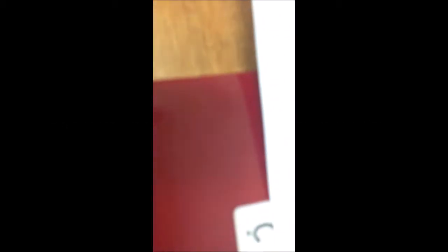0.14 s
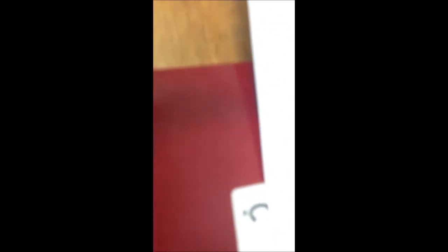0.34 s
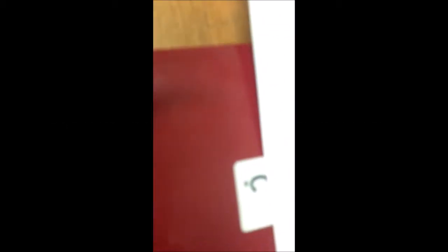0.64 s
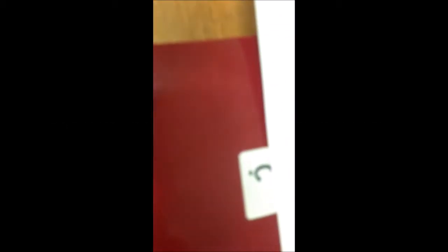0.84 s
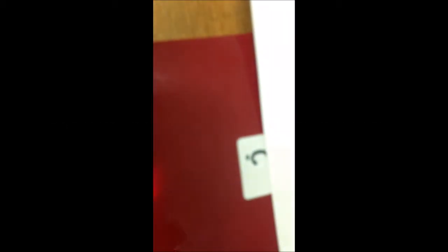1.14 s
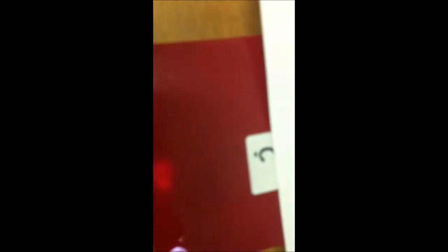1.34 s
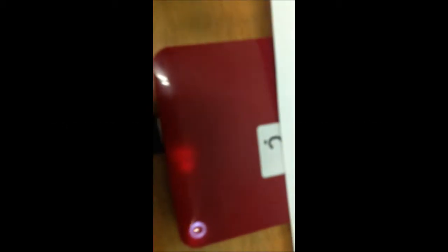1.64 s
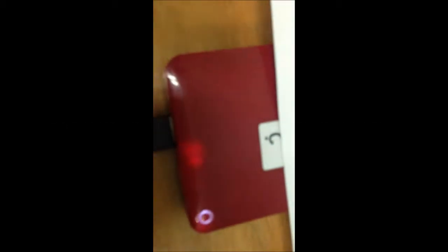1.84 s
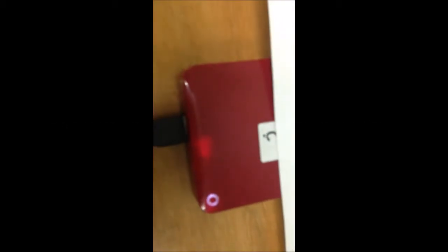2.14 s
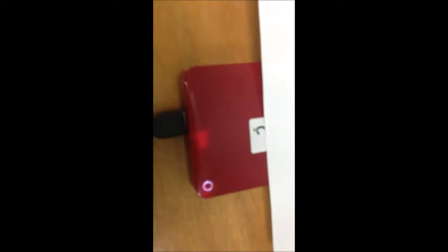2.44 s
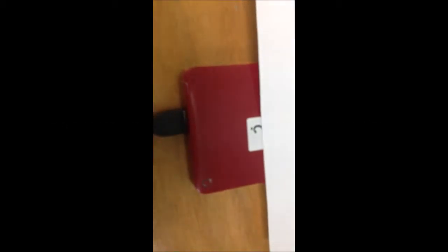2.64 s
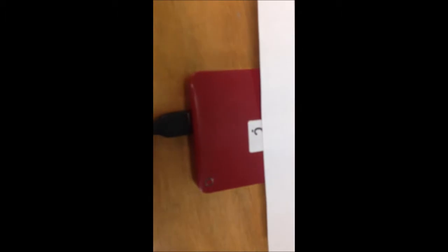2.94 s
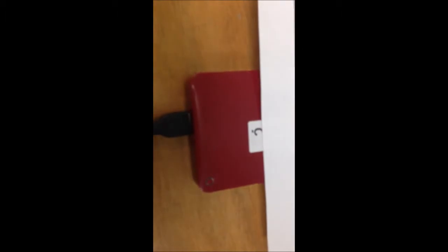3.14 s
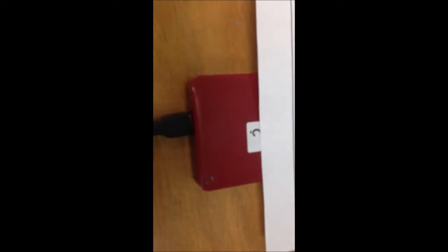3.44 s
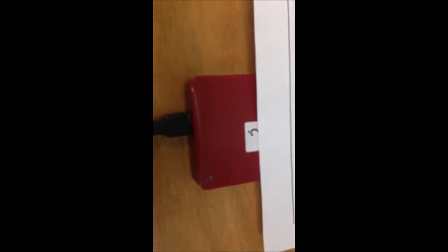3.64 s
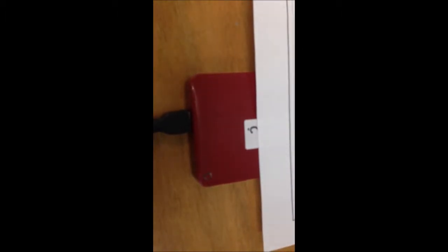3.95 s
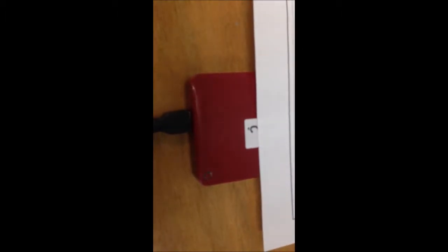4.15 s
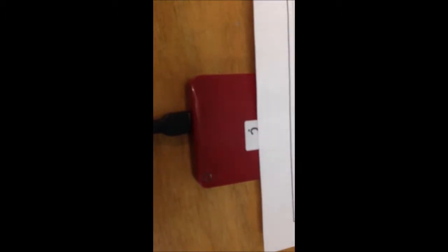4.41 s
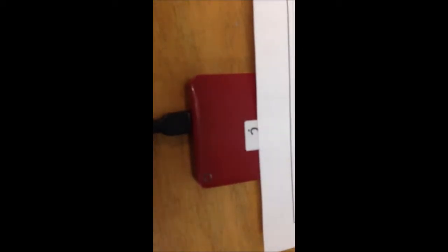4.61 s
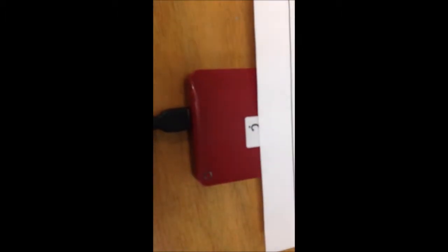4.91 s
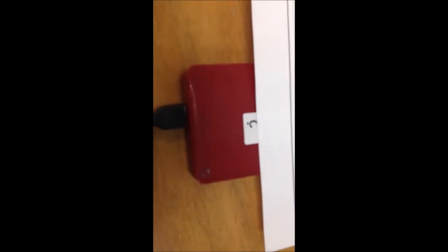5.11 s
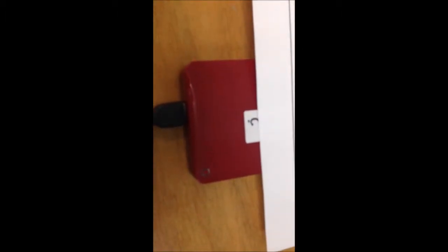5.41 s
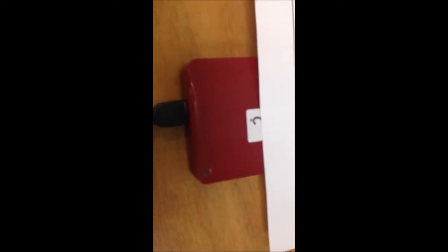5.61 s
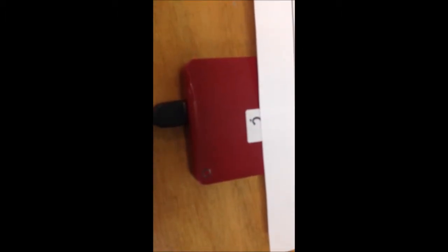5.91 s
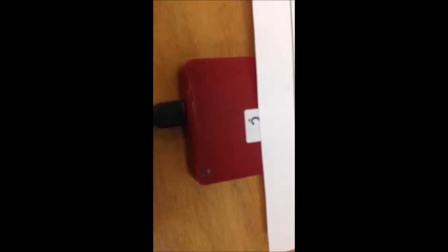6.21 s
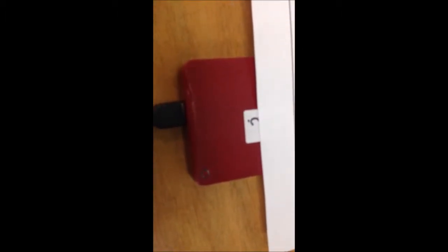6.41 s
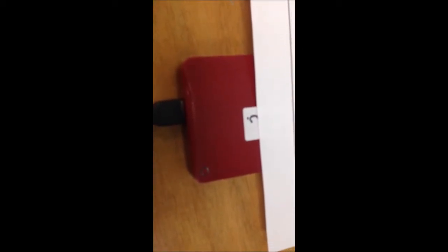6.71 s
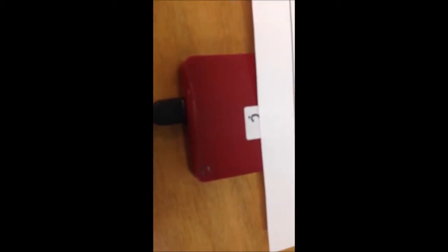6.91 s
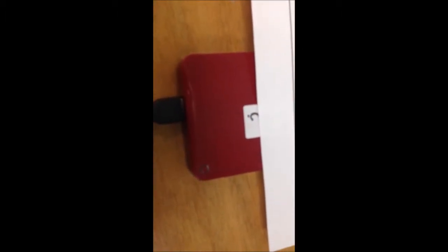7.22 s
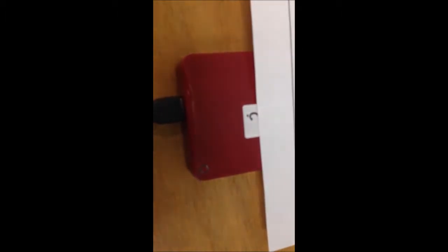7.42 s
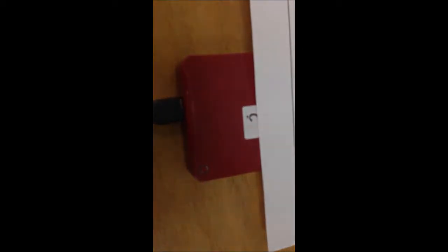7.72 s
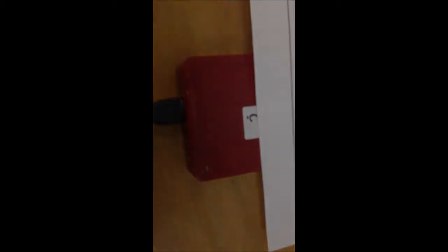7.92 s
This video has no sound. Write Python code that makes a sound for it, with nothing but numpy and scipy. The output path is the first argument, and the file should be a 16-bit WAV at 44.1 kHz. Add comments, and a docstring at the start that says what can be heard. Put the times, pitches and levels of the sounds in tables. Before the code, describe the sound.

A small external hard drive on a wooden desk clicks right from the start, heard close up in a room with little echo. The click repeats evenly every 0.8 seconds, ten times in all, the last at about 7.3 seconds. Each one is sharp and bright, with a tiny rebound and a brief metallic ring, and is followed by a very faint whisper as the drive's arm seeks. The first three clicks are the strongest; from about 2.4 seconds they are slightly softer, and they grow a little duller toward the end. Faint dry scrapes of handling come at around 0.2 to 0.4 seconds and again at 2.1 seconds. Two soft bumps of a hand on the microphone fall at about 0.7 and 1.6 seconds. A quiet, low room hum continues steadily underneath throughout.

```python
"""Sharp, ringing clicks, one every 0.8 s, come from a small external hard drive on a wooden desk.
Each time the head arm buzzes, slams into its stop and rebounds twice; the impacts excite the damped
modes of the case. Then the arm seeks faintly. The clicks weaken after the third, as a hand-held camera
backs away. Behind them are a low room hum, two soft bumps of the hand and some faint scrapes."""
import sys
import numpy as np
from scipy import signal
from scipy.fft import rfft, irfft
from scipy.io import wavfile

SR = 44100
rng = np.random.default_rng(int(sys.argv[2]) if len(sys.argv) > 2 else 0)


def dump_mix(stems):
    """Bounce the given channels to the path in sys.argv[1] as a 16-bit WAV at rate SR."""
    frames = np.atleast_2d(stems).T  # one column per channel
    limited = np.clip(frames, -1, 1)  # hard clip at full scale
    pcm = np.round(limited * 32767).astype(np.int16)
    wavfile.write(sys.argv[1], SR, pcm)


N = 355401

# steady room noise: (frequency [Hz], relative density [dB])
ROOM_SPECTRUM = [(20, -23), (50, -8.5), (75, -12), (125, 1), (185, 6.5), (260, 3.5), (310, -0.5), (500, -4),
                 (750, -6), (900, -12.5), (1600, -15), (2800, -19.5), (7000, -23.5), (15000, -24.5)]
# resonances of the hum: (frequency [Hz], half width [Hz], rms level [dB])
HUM_BANDS = [(57.4, 2.1, -76), (88.2, 3.6, -71.5), (146.8, 6.2, -63.5), (203.2, 12, -60), (221.6, 9, -53.5),
             (249, 8.6, -68.5), (339.2, 8.7, -68.5), (467, 18, -71.5), (506.4, 3.5, -75), (604.4, 5.9, -73)]
# reverberation of desk and room: (frequency [Hz], t60 [s])
ROOM_T60 = [(200, .2), (1400, .09), (3200, .095), (6000, .09), (14000, .07)]
# bumps of the hand: (time [s], gain [dB])
BUMP_EVENTS = [(.746, -47), (1.586, -47.5)]
# modes that a bump excites: (frequency [Hz], relative level [dB], t60 [s])
THUD_MODES = [(154, -7, 0.4), (261, 3, 0.14), (334.5, 3, 0.18), (447, 2, 0.055), (727, 1.5, 0.051)]
# tick of a bump: (frequency [Hz], relative density [dB])
TICK_SPECTRUM = [(100, -13), (500, 2), (1000, -21), (2200, -5), (4000, -16), (6500, -10), (15000, -25)]
# dry scrapes: (time [s], duration [s], level [dB])
SCRAPE_EVENTS = [(0.243, 0.056, -52), (0.347, 0.032, -54), (0.36, 0.07, -50.5), (2.11, .12, -59)]
# friction noise: (frequency [Hz], relative density [dB])
SCRAPE_SPECTRUM = [(500, 5.5), (1300, -10), (2100, -1.5), (3200, -4), (4500, -11), (6500, -17), (9000, -18),
                   (15000, -24)]
# sweeps of the arm: (delay after the click [s], duration [s], level relative to the click's gain [dB])
ARM_SWEEPS = [(0.213, 0.084, -71.5), (0.334, 0.083, -75.5), (.19, 0.29, -79)]
# whisper of seeking: (frequency [Hz], relative density [dB])
SEEK_SPECTRUM = [(1000, -13), (2700, -10), (3200, 3), (4000, -2), (4700, -6.5), (5500, -3.5), (7000, -13),
                 (15000, -31)]
# tones of the arm's coil: (frequency [Hz], relative level [dB])
COIL_TONES = [(1720, -52.5), (3050, -51), (3400, -47), (3960, -31.5), (4460, -45)]
# rasp of the coil: (frequency [Hz], relative density [dB])
RASP_SPECTRUM = [(600, -20), (1500, 5), (2500, -20), (4000, -3), (5000, 1), (5700, -1), (6500, -1),
                 (7500, -28), (15000, -15)]
# modes of the case: (frequency [Hz], relative level [dB], t60 [s])
CASE_MODES = [(753, -46, 0.067), (955, -49.5, 0.069), (1302, -38.5, 0.056), (1416, -34, 0.017),
              (1523, -35.5, 0.03), (2107, -36, 0.03), (2890, -47, 0.025), (3058, -22.5, 0.029),
              (3277, -25.5, 0.031), (3406, -25, 0.03), (3824, -36.5, 0.05), (3990, -29.5, 0.02),
              (4115, -34.5, 0.033), (4440, -38, 0.023), (5375, -27, 0.014), (8390, -49, 0.022)]
# contacts within one blow: (delay [ms], relative level [dB])
CHATTER_CONTACTS = [(.6, 0.5), (1.9, -3.5), (3.4, -3.5)]
# broad resonances of the metal parts: (frequency [Hz], half width [Hz], relative level [dB])
METAL_BANDS = [(1440, 730, -16.5), (3360, 360, -4), (4560, 420, -7), (5330, 110, -11.5), (6420, 740, -9),
               (8405, 120, -11), (9360, 190, -17), (10070, 280, -16.5), (12060, 450, -20.5),
               (13400, 250, -17.5), (14600, 450, -22)]
# the crack weakens, so the clicks grow duller: (time [s], relative level [dB])
CRACK_TREND = [(0, 5.5), (4, 4.5), (7.3, 1.5)]
# blows of the arm on its stop: (time [s], gain [dB], delay of the first rebound [ms])
CLICK_EVENTS = [(.0031, 2.5, 10.4), (0.8092, 2, 10.5), (1.6171, 0.9, 11.5), (2.4151, -1.6, 12.5),
                (3.2165, -2, 11.2), (4.022, -2, 10.7), (4.83, -2.2, 10.6), (5.6378, -2, 11.3),
                (6.4514, -0.9, 9.9), (7.261, -1.1, 10.5)]

BUZZ_DB = -3.3  # added to the click's gain
REBOUND_GAINS_DB, REBOUND_SPREAD_DB = (-2.5, -16), 1.46
REBOUND_DELAY_RATIO = 2.3  # second rebound to first
RING_TILT_DB_PER_OCTAVE, MODE_SPREAD_DB = 0.4, 1.17
CUTOFF_HZ = 15330


def amp(db):
    return 10 ** (np.asarray(db) / 20)


def unit(x):
    return x / np.sqrt(np.mean(x ** 2) + 1e-20)


def log_interp(points, hz):
    """Linear interpolation of (frequency, value) points on a log-frequency axis."""
    f, value = np.transpose(points)
    return np.interp(np.log(hz + 1), np.log(f + 1), value)


def add(mix, s, sound):
    """Superposition: a sound joins the mix at time s."""
    at = int(round(s * SR))
    sound = sound[max(-at, 0):]
    part = mix[max(at, 0):][:len(sound)]
    part += sound[:len(part)]


def noise(spectrum, size):
    """Spectral shaping of white noise, scaled to rms 1."""
    hz = np.fft.rfftfreq(size, 1 / SR)
    return unit(irfft(rfft(rng.standard_normal(size)) * amp(log_interp(spectrum, hz)), size))


def wander(rate_hz):
    """Low-pass filtering of noise gives a random curve of rms 1."""
    hz = np.fft.rfftfreq(N, 1 / SR)
    return unit(irfft(rfft(rng.standard_normal(N)) * np.exp(-(hz / rate_hz) ** 2), N))


def resonant_noise(bands, size):
    """Resonance gathers random excitation into bands."""
    hz, out = np.fft.rfftfreq(size, 1 / SR), np.zeros(size)
    for centre, width, db in bands:
        band = irfft(rfft(rng.standard_normal(size)) / (1 + ((hz - centre) / width) ** 2), size)
        out += amp(db) * unit(band)
    return out


def room_hum():
    """Narrow resonances of running machines waver over broadband room noise."""
    return resonant_noise(HUM_BANDS, N) + amp(-55.5) * noise(ROOM_SPECTRUM, N)


def reverberation(source, delay_s):
    """Diffuse reflections decay exponentially, the treble first."""
    hz, t, spectra = signal.stft(rng.standard_normal(SR // 2), SR, nperseg=256)
    decay = amp(-60 * t / log_interp(ROOM_T60, hz)[:, None])
    tail = signal.istft(spectra * decay, SR, nperseg=256)[1]
    out = np.zeros(N)
    add(out, delay_s, signal.fftconvolve(source, tail / np.linalg.norm(tail)))
    return out


def hand_bumps(tick_t60, tick_db):
    """Soft impacts of the hand on the camera excite low damped modes and a tick."""
    out, t = np.zeros(N), np.arange(8192) / SR
    thud = sum(amp(db - 60 * t / t60) * np.sin(2 * np.pi * hz * t) for hz, db, t60 in THUD_MODES)
    for s, db in BUMP_EVENTS:
        tick = amp(tick_db - 60 * t / tick_t60) * noise(TICK_SPECTRUM, len(t))
        add(out, s, amp(db) * (thud + tick))
    return out


def scrapes(grain_db):
    """Sliding friction gives short strokes of noise, made grainy by random amplitude modulation."""
    friction = unit(noise(SCRAPE_SPECTRUM, N) * amp(grain_db * wander(rate_hz=62)))
    strokes = np.zeros(N)
    for s, length, db in SCRAPE_EVENTS:
        add(strokes, s, amp(db) * signal.windows.hann(int(length * SR)))
    return strokes * friction


def seeking(idle_db, flutter_db):
    """Amplitude-modulated noise: a whisper swells as the arm sweeps over the spinning platter."""
    envelope = np.full(N, amp(idle_db))
    for s, click_db, _ in CLICK_EVENTS:
        for after_s, length, db in ARM_SWEEPS:
            add(envelope, s + after_s, amp(click_db + db) * signal.windows.hann(int(length * SR)))
    flutter = amp(flutter_db * np.minimum(wander(rate_hz=70), 2))
    return envelope * unit(flutter * noise(SEEK_SPECTRUM, N))


def coil_buzz(t, length_s, t60, rasp_db):
    """Forced vibration: the coil sings and rasps as it flings the arm, then rings down."""
    tones = sum(amp(db) * np.sin(2 * np.pi * hz * (t - length_s / 2)) for hz, db in COIL_TONES)
    attack = np.minimum(t / 0.00059, 1)
    release = amp(-60 * np.maximum(t - length_s, 0) / t60)
    return attack * release * (tones + amp(rasp_db) * noise(RASP_SPECTRUM, len(t)))


def case_ring(t, swell_s, detune):
    """The normal modes of the case build up while the arm presses on its stop, then decay freely."""
    hz, db, t60 = np.transpose(CASE_MODES)[:, :, None]
    hz = hz * (1 + detune * rng.standard_normal(hz.shape))
    db = db + RING_TILT_DB_PER_OCTAVE * np.log2(hz / np.median(hz))
    db += MODE_SPREAD_DB * rng.standard_normal(hz.shape)
    polarity = (-1) ** np.arange(len(CASE_MODES))[:, None]
    modes = polarity * amp(db - 60 * t / t60) * np.sin(2 * np.pi * hz * t)
    return modes.sum(0) * (1 - np.exp(-(t / swell_s) ** 2))


def crack(t, t60):
    """Contact chatter: each brief, hard touch excites the metal parts over a wide band."""
    out = np.zeros(len(t))
    for ms, db in CHATTER_CONTACTS:
        add(out, ms * 1e-3, amp(db - 60 * t / t60) * resonant_noise(METAL_BANDS, len(t)))
    return out


def arm_clicks():
    """Inelastic collision: driven by its coil, the arm hits its stop and rebounds twice."""
    out, t = np.zeros(N), np.arange(4096) / SR
    common_crack = crack(t, t60=0.018)  # the arm lands in nearly the same way every time
    scatters_db = REBOUND_SPREAD_DB * rng.standard_normal((len(CLICK_EVENTS), 2))
    for (s, click_db, rebound_ms), scatter_db in zip(CLICK_EVENTS, scatters_db):
        # a strong push of the coil, then a weaker one just before the blow
        coil = amp(click_db + BUZZ_DB)
        add(out, s - 0.0078, coil * coil_buzz(t, length_s=0.0028, t60=0.011, rasp_db=-48))
        add(out, s - 0.0032, coil * amp(-9.5) * coil_buzz(t, length_s=0.0024, t60=0.0082, rasp_db=-40))
        crack_db = np.interp(s, *np.transpose(CRACK_TREND))
        blow = common_crack + 0.75 * crack(t, t60=0.021)
        add(out, s, amp(click_db + crack_db - 36.5) * blow)
        ring = case_ring(t, swell_s=0.0014, detune=0.002)
        add(out, s + 0.000896, amp(click_db + 2.14) * ring)
        delays_ms = rebound_ms, rebound_ms * REBOUND_DELAY_RATIO
        for ms, db in zip(delays_ms, scatter_db + REBOUND_GAINS_DB):
            ring = case_ring(t, swell_s=0.0029, detune=0.0047)
            tick = amp(crack_db - 32.5) * crack(t, t60=0.011)
            rebound = tick + amp(0.6 * db + 2.0) * ring  # a lighter rebound has less ring for its tick
            add(out, s + ms * 1e-3, amp(click_db + db) * rebound)
    return out


def scene():
    """Superposition of hum, handling, the drive and its reflections at one point."""
    drive = arm_clicks() + seeking(idle_db=-76, flutter_db=4)
    handling = hand_bumps(tick_t60=0.05, tick_db=-3) + scrapes(grain_db=4.5)
    reflections = amp(-9.0) * reverberation(drive, delay_s=0.004)
    return (room_hum() + handling + reflections + drive)[None]


def record(dry):
    """Band limiting: a low-pass filter removes the highest treble."""
    lowpass = signal.firwin(511, CUTOFF_HZ, window=("kaiser", 9), fs=SR)
    return signal.oaconvolve(dry, lowpass[None], "same")


dry = scene()
out = record(dry)
dump_mix(out)
```